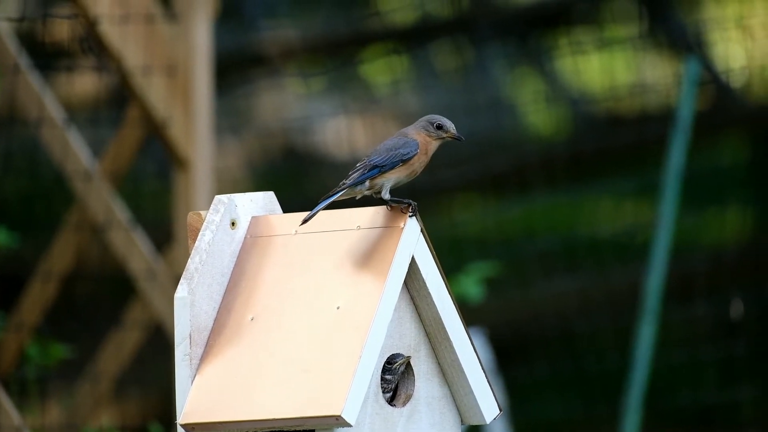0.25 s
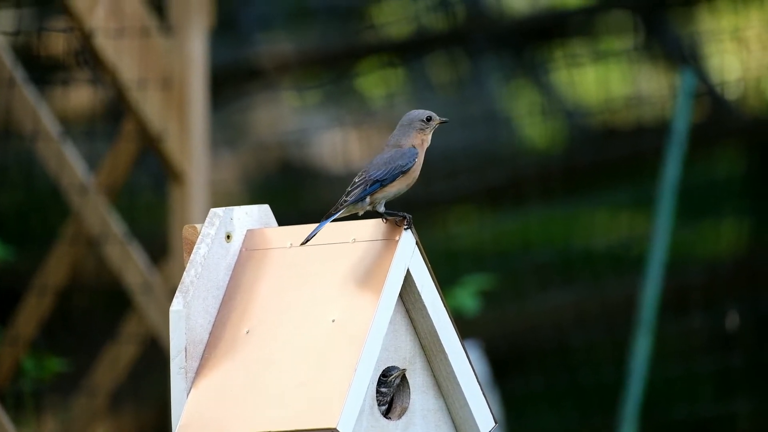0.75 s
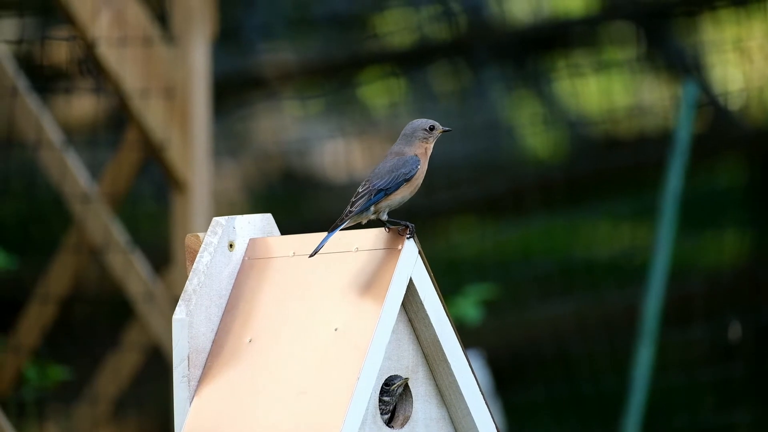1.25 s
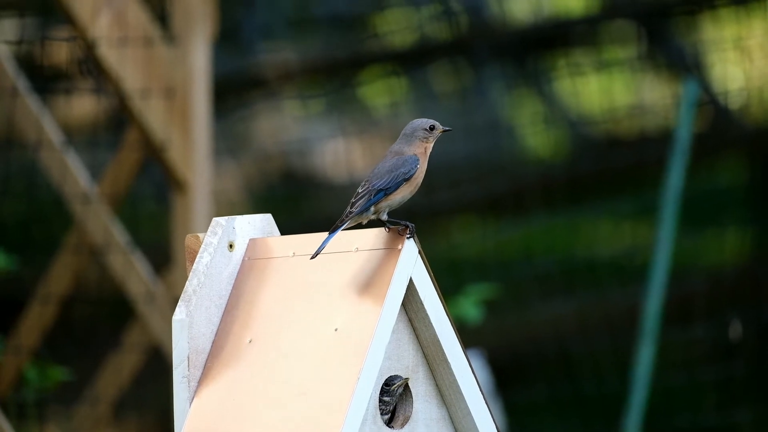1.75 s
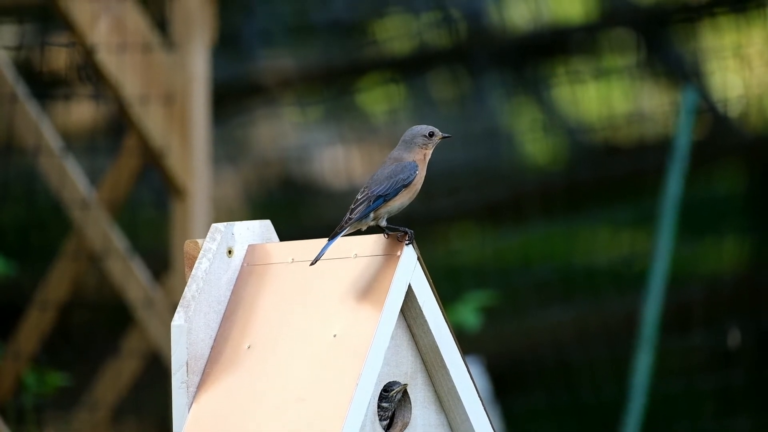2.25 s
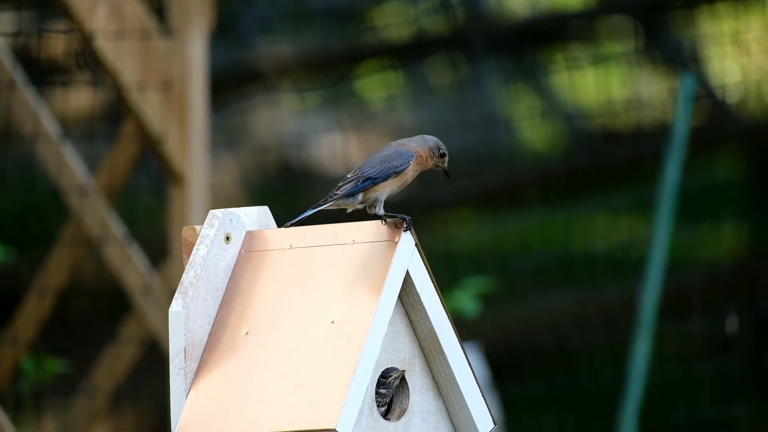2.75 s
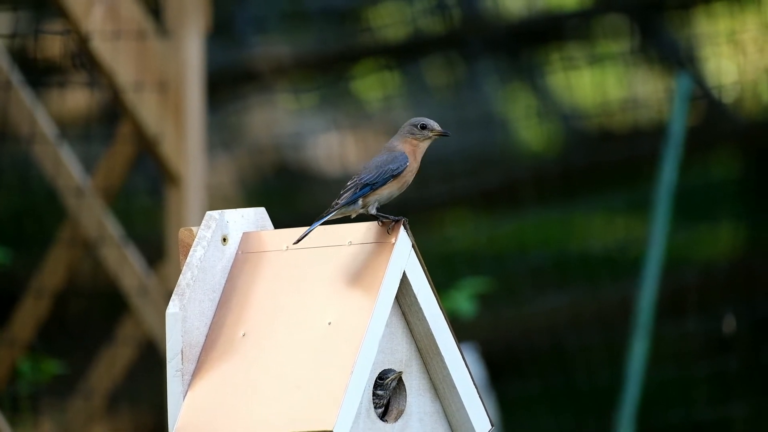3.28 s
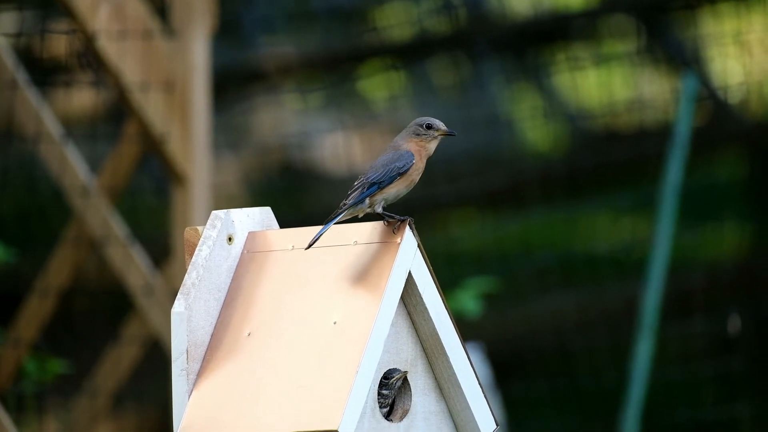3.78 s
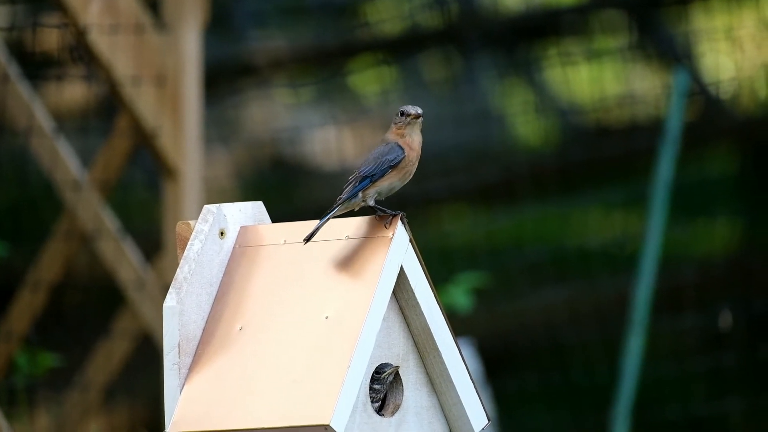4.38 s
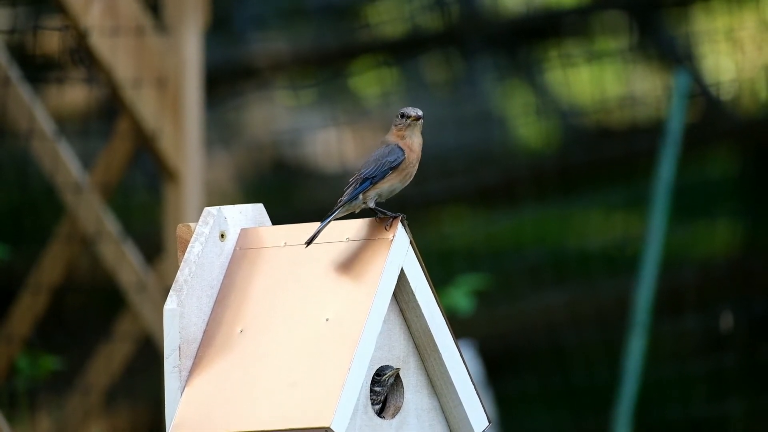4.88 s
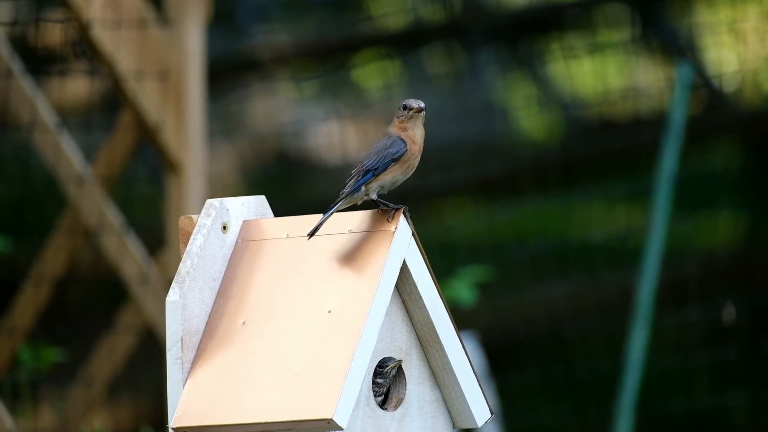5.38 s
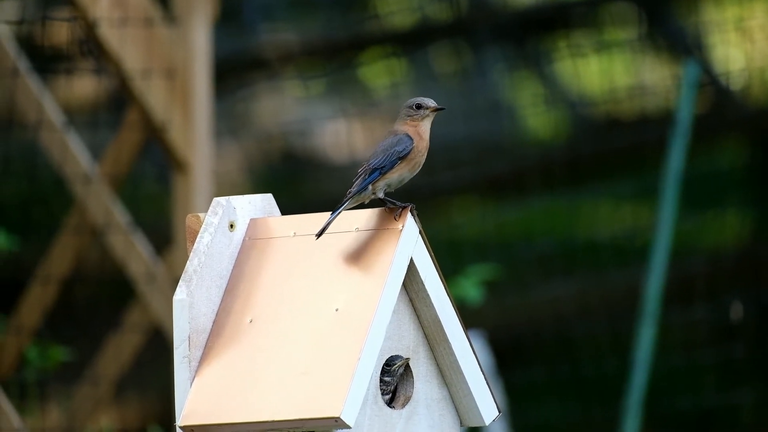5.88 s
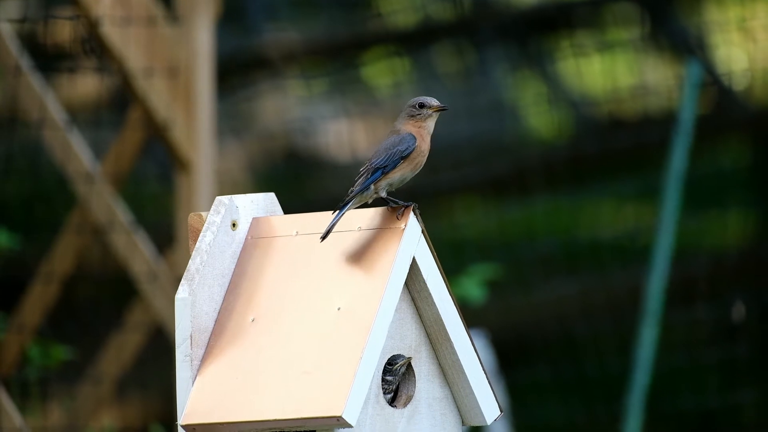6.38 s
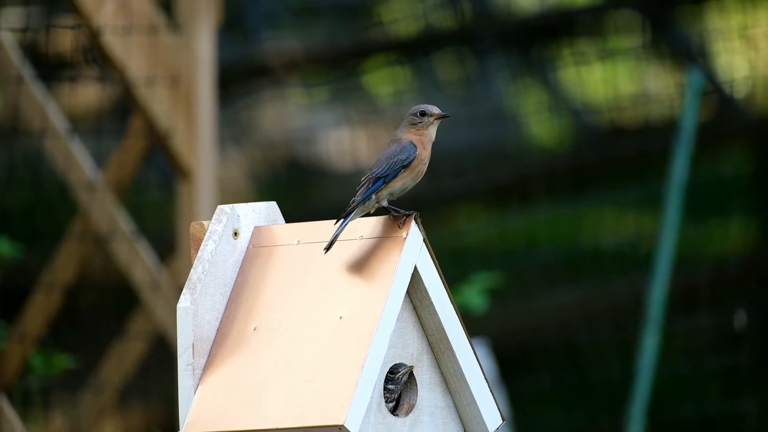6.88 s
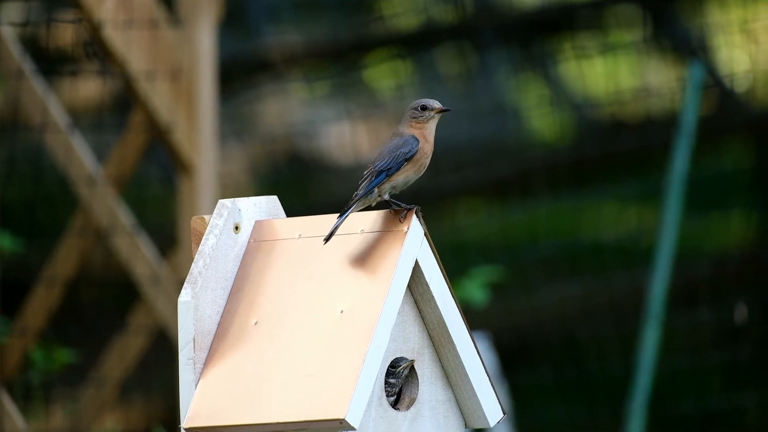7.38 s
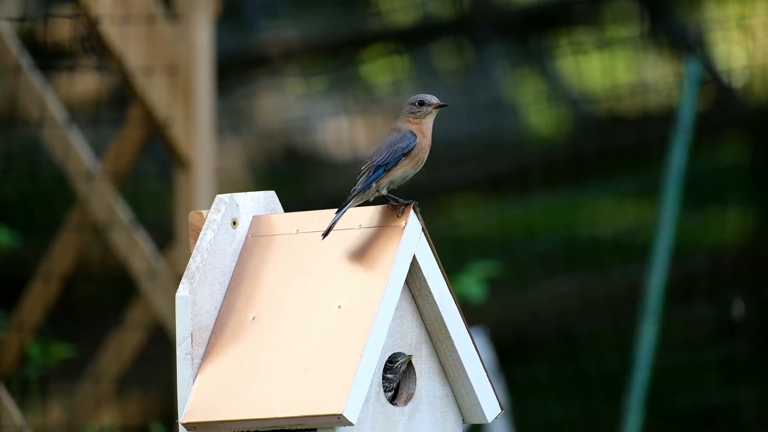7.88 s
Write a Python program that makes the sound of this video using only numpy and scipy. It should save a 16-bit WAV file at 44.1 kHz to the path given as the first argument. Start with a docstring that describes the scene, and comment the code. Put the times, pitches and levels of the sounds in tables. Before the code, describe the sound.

Outdoor stereo pickup at moderate distance: low far traffic and faint airy hiss beneath a small bird's raspy double chirps and mellow downward whistles, heard in three bouts. Faint twittering and thin peeps run behind. After the second bout a vehicle hums by softly and something nearby ticks twice. A distant bird then repeats a steady falling slur under the last chatter and whistles, with two faint dull taps near the end.

```python
"""Far traffic builds under a faint hiss while a bluebird on a nest box in a yard gives dry chatter, then falling whistles.
Thin begging notes and distant song run throughout, with sharp chips now and then; fence and trees echo the birds.
The bluebird chatters and whistles again from the third second; then a vehicle drones past and something ticks twice.
A steady far slur and a last bout of chatter and whistles follow; two faint dull taps come near the end.
Birds are gliding sines or harmonic stacks, knocks are damped tones, and traffic and air are shaped noise."""
import sys
import numpy as np
from scipy import signal
from scipy.fft import rfft, irfft, next_fast_len
from scipy.io import wavfile
from scipy.ndimage import uniform_filter1d, map_coordinates

SR = 44100
rng = np.random.default_rng(int(sys.argv[2]) if len(sys.argv) > 2 else 0)


def unload_audio(sound):
    """Save the sound as a 16-bit wav file, at the path given as the first command line argument."""
    columns = np.transpose(np.atleast_2d(sound))
    # keep every value between -1 and 1, then stretch to whole-number steps
    steps = np.round(np.clip(columns, -1, 1) * 32767)
    wavfile.write(sys.argv[1], SR, steps.astype(np.int16))


N = 358974
T = np.arange(N) / SR
TOP_HZ = 15750  # nothing sounds above this

# Far traffic, its deep rumble, the passing vehicle and the open air.
# Each row: frequency in Hz, relative level in dB per Hz.
ROAD_SPECTRUM = [(60, -30), (100, -8.5), (135, -1), (190, 0.5), (235, -4.5), (300, -10.5), (400, -11.5),
                 (600, -19), (1200, -64)]
RUMBLE_SPECTRUM = [(10, -19.5), (22, -12.5), (40, -7.5), (56, -3), (75, -0.5), (100, -8), (150, -25.5),
                   (400, -50.5)]
DRONE_SPECTRUM = [(70, -22), (120, -1), (180, 0.5), (240, -6), (330, -24), (1500, -90)]
AIR_SPECTRUM = [(300, -11), (500, -2.5), (800, 1), (1200, -3.5), (1800, -8.5), (3000, -11), (4500, -15),
                (6500, -22.5), (10000, -30), (15000, -42.5)]
# Stereo width of the noise. Each row: frequency in Hz, left-right likeness from 0 to 1.
STEREO_LIKENESS = [(60, 0.91), (150, 0.99), (380, 0.93), (950, 0.61), (2380, 0.11), (5980, 0.05),
                   (15000, 0.17)]
TRAFFIC_DB, BUILD_DB, BUILD_S = -48, 4, 2.9  # level once built, how much quieter it starts, time to build
PASS_S, PASS_SPREAD_S, PASS_DB = 4.63, .29, -45.3  # loudest moment, spread of the bell-shaped swell, peak level

# Single echoes off fence and walls.
# Each row: delay in seconds, left level in dB, right level in dB, both before a source's own echo level.
WALL_ECHOES = [(.0045, -25.5, -23.5), (.0125, -6.5, -9.5), (.028, -18.5, -17.5), (.046, -28.5, -26)]
# Decay of the diffuse tail. Each row: frequency in Hz, time to fall 60 dB in seconds.
YARD_DECAY = [(500, 0.15), (2500, 0.61), (7000, 0.46), (14000, 0.36)]

# Bouts of faint, quick twittering. Each row: start in seconds, end in seconds, centre pitch in Hz, level in dB.
TWITTER_BOUTS = [(0, .25, 3400, -71), (.58, .75, 8100, -66), (1.65, 2.25, 2550, -70),
                 (1.95, 2.2, 6200, -73), (2.15, 2.65, 3800, -72), (4.3, 4.7, 2797, -67.5),
                 (4.78, 5.2, 3390, -69), (5.53, 5.72, 2950, -62), (7.55, 8.1, 2650, -65)]
STROKES_PER_S, STROKE_S, STROKE_SPREAD_DB = 24, .035, 1.5
STROKE_OCTAVES, STROKE_GLIDE_OCTAVES = .14, .27  # random spread of pitch, and of how far each stroke slides
# Nearer notes of a distant warbling song.
# Each row: start in seconds, length in seconds, start pitch in Hz, end pitch in Hz, level in dB.
WARBLE_NOTES = [(.1, .11, 3750, 3580, -67), (0.209, .042, 2490, 2360, -56), (1.945, 0.083, 3000, 2420, -68),
                (2.014, 0.14, 2380, 2200, -63), (2.612, .037, 4700, 3470, -62.5),
                (3.69, .07, 2350, 3200, -59), (4.18, .15, 3750, 3426, -63.5), (4.251, .15, 2680, 2250, -55),
                (4.403, .092, 3580, 2650, -56.5), (4.83, 0.056, 3000, 3500, -64),
                (5.436, 0.046, 3080, 2520, -61), (5.464, .059, 3120, 2050, -55),
                (5.566, .045, 2800, 3610, -52), (5.61, 0.048, 2300, 3400, -54.5),
                (5.667, .04, 2500, 3200, -59), (6.039, 0.064, 3400, 2150, -55),
                (6.108, .1, 2500, 2350, -55.5)]
# Thin, nearly level whistles of small birds.
# Each row: start in seconds, length in seconds, middle pitch in Hz, level in dB.
THIN_NOTES = [(.17, .094, 7800, -75), (.53, 0.091, 11200, -69), (.585, 0.14, 7700, -64),
              (.623, .23, 6440, -61.5), (1.625, .16, 7500, -66.5), (2.436, .15, 7760, -70.5),
              (4.88, 0.316, 3240, -72), (5.38, .074, 6380, -72), (5.45, .2, 4320, -74),
              (5.72, .09, 4110, -67), (5.839, .13, 4100, -63.5), (5.93, .14, 8300, -77)]
THIN_SAG = .035  # their ends lie this share above the middle
# Faint low calls from far away. Each row: start in seconds, pitch in Hz, level in dB.
HOOTS = [(.155, 825, -51.5), (.47, 903, -53), (.80, 894, -53.5), (.85, 802, -58), (.98, 806, -52),
         (6.56, 853, -53), (6.80, 873, -51.5)]
# A far songbird's falling notes, louder and deeper each time. Each row: start in seconds, end pitch in Hz, level in dB.
PHRASE_FALLS = [(6.965, 2980, -63), (7.291, 2900, -60.5), (7.612, 2420, -55.5), (7.937, 2330, -53)]
FALL_S, FALL_START_HZ = .095, 3267
# The low scoop before its next fall. Each row: seconds into the phrase, pitch in Hz, relative level in dB.
PHRASE_SCOOP = [(.18, 2403, -9), (.205, 1750, -3), (.24, 1480, -11), (.28, 1560, -5.5), (.325, 1796, -9)]
# Another bird's falling slur. Each row: seconds after the start, pitch in Hz, relative level in dB.
SLUR_SHAPE = [(0, 6700, -21), (.025, 4867, -17), (.055, 4016, -6.5), (.11, 3280, -4), (.15, 2990, -15)]
SLUR_START_S, SLUR_PERIOD_S, SLUR_DB = 6.009, .329, -55.3
# Slow rising whistles. Each row: start in seconds, level in dB.
RISES = [(4.765, -61.5), (5.53, -58.5)]
# Shape of one. Each row: seconds after the start, pitch in Hz, relative level in dB.
RISE_SHAPE = [(0, 1688, -9), (.11, 1890, 0.5), (.19, 2150, -2.5), (.26, 2480, 3.5), (.305, 2560, -3)]

# Faint dull taps. Each row: start in seconds, pitch in Hz, level in dB.
TAPS = [(7.684, 950, -37), (7.741, 1230, -40)]
# Ticks close by. Each row: start in seconds, level in dB.
TICKS = [(5.0556, -24), (5.2192, -18.5)]
# Ringing modes of a tick. Each row: frequency in Hz, relative level in dB, time to fall 60 dB in seconds.
TICK_MODES = [(400, -16, 0.016), (1110, -4.5, 0.0074), (1590, -4.5, 0.0039), (2470, -7, 0.0035),
              (4560, -12, 0.004)]

# Sharp rising chips. Each row: start in seconds, level in dB.
CHIPS = [(1.706, -39.5), (4.05, -39.5), (7.329, -38.5)]
# Shape of one chip. Each row: seconds after the start, pitch in Hz, relative level in dB.
CHIP_SHAPE = [(0, 5120, -11), (.003, 6010, -2.5), (.005, 6800, 1.5), (.008, 7870, -4), (.010, 8200, -4.5),
              (.012, 8530, -28)]
# Thin begging notes. Each row: seconds at the dip, level in dB, length as a share of the full shape.
BEGS = [(.41, -60.5, 1), (.87, -59, 0.72), (1.369, -61, 0.77), (1.946, -56.5, 0.68), (3.434, -55.5, 1),
        (5.125, -59.5, 1), (6.90, -53.5, 1)]
# Shape of one at full length. Each row: seconds from the dip, pitch in Hz, relative level in dB.
BEG_SHAPE = [(-.028, 10500, -20), (-.018, 8320, -11), (-.007, 7390, -2.5), (.004, 7200, -2),
             (.03, 7900, -7.5), (.055, 8760, -11.5), (.075, 10050, -20)]

# Bluebird chatter. Each row: seconds at the top of the arch, reference pitch in Hz, level in dB.
CHATTER_NOTES = [(.331, 928, -33.5), (.399, 1065, -32.5), (2.710, 925, -36), (2.768, 1082, -35),
                 (3.320, 914, -35.7), (6.255, 944, -32.5), (6.355, 1156, -32)]
# Shape of one note. Each row: seconds from the top, ratio to the reference pitch, relative level in dB.
CHATTER_ARCH = [(-.026, .42, -27.5), (-.016, .52, -12), (-.009, .70, -8), (-.003, 0.91, -3.5),
                (0, 0.96, -3.5), (.003, .96, -4.5), (.008, .72, -11), (0.013, .55, -34)]
# Resonance of the throat. Each row: frequency in Hz, gain in dB.
THROAT_RESONANCE = [(900, -41), (1500, -18), (2000, -9), (2900, 6), (3400, 0), (4200, -6), (5300, -15.5),
                    (6300, -32.5), (10000, -34), (15000, -42)]

# Bluebird whistles. Each row: start in seconds, length in seconds, pitch in Hz at the start, a third,
# two thirds and the end (before scoop and hook), scoop as a share of pitch, hook as a share of pitch,
# peak level in dB, attack in seconds, fade after the peak in dB.
WHISTLES = [(.505, 0.24, 3030, 2660, 2435, 2150, .05, 0.018, -28.5, 0.058, 18),
            (.826, 0.13, 2500, 2435, 2330, 2190, .03, .05, -42.5, 0.017, 1),
            (3.79, .26, 2850, 2638, 2380, 2090, .03, 0, -29.2, 0.051, 13.3),
            (6.414, 0.23, 3126, 2659, 2485, 2250, .13, .1, -28.5, .066, 12.6),
            (6.713, .142, 2515, 2446, 2360, 2175, .03, 0.084, -35, 0.041, 4.5),
            (6.902, .11, 2600, 2285, 2120, 2154, .24, 0.036, -40, 0.017, 4.2)]
# Each row: multiple of the fundamental, relative level in dB before the beak's colour.
WHISTLE_OVERTONES = [(2, -34), (3, -40.5), (4, -37.5), (5, -38.5), (6, -39)]
# The beak's colour on the overtones. Each row: frequency in Hz, gain in dB.
BEAK_COLOUR = [(4000, 13), (4500, 5), (5000, -3.5), (5700, -16), (7500, -6), (9000, -5.5), (10500, -0.5),
               (15000, -11)]
SCOOP_S, HOOK_S = .011, .005  # time constants of the slide up into pitch and the hook down at the end
ONSET_DB, RELEASE_DB = 23.5, 10  # how far below its peak a whistle starts, and the extra drop as it stops
ATTACK_CURVE = 1.48  # above 1, the swell slows as it nears the peak


def amp(db):
    """Decibels to gain."""
    return 10 ** (np.asarray(db) / 20)


def unit(x):
    """Scale to rms 1."""
    return x / np.sqrt(np.mean(x ** 2) + 1e-20)


def along(points, hz):
    """Read (Hz, value) points on a log frequency axis."""
    f, v = np.transpose(points)
    return np.interp(np.log(hz + 1), np.log(f + 1), v)


def wobble(rate, size=N):
    """A smooth random curve through `rate` random knots a second."""
    knots = rng.standard_normal(int(size * rate / SR) + 4)
    return map_coordinates(knots, [np.arange(size) * rate / SR])


def filtered(x, response):
    """Shape x by a response given as a function of frequency."""
    m = next_fast_len(N + SR // 2)
    return irfft(rfft(x, m) * response(np.fft.rfftfreq(m, 1 / SR)), m)[..., :N]


def add(track, s, sound):
    """Mix a sound into a track at time s."""
    part = track[max(round(s * SR), 0):][:len(sound)]
    part += sound[:len(part)]


def gesture(rows, jitter):
    """Pitch, phase and gain of one note from (s, Hz, dB) rows; jitter is a random share of the pitch."""
    s, hz, db = np.transpose(rows)
    t = np.arange(s[0], max(s[-1], s[0] + .005), 1 / SR)
    smooth = uniform_filter1d(np.interp(t, s, hz), len(t) // 10 + 1, mode="nearest")
    pitch = smooth * (1 + jitter * wobble(341.7, len(t)))
    phase = 2 * np.pi * np.cumsum(pitch) / SR
    edges = signal.windows.tukey(len(t), .1)
    return pitch, phase, np.sqrt(2) * edges * amp(np.interp(t, s, db))  # root 2: levels are rms of a sine


def tones(notes, jitter, overtones=()):
    """Whistled notes: a sine on each gesture, with optional weak overtones."""
    out = np.zeros(N)
    for rows in notes:
        _, phase, gain = gesture(rows, jitter)
        upper = sum(amp(db) * np.sin(k * phase) for k, db in overtones)
        add(out, rows[0][0], gain * (np.sin(phase) + upper))
    return out


def repeated(shape, events):
    """The same note shape sung at each (s, dB)."""
    return [[(s + dt, hz, db + rel) for dt, hz, rel in shape] for s, db in events]


def series(start_s, period_s, db, count):
    """(s, dB) of evenly paced repeats."""
    return [(start_s + k * period_s, db) for k in range(count)]


def arc(s, length, pitches, db, fade_db):
    """Rows of a note that bends smoothly through three pitches and is loudest in the middle."""
    u = np.linspace(-1, 1, 9)
    bend = np.polyval(np.polyfit([-1, 0, 1], pitches, 2), u)
    return np.transpose([s + length * (u + 1) / 2, bend, db - fade_db * u ** 2])


def glide(s, length, start_hz, end_hz, db, fade_db):
    """Rows of a note that slides smoothly from one pitch to another through their geometric mean."""
    return arc(s, length, [start_hz, np.sqrt(start_hz * end_hz), end_hz], db, fade_db)


def yard(x, pan_db, wall_db, tail_db):
    """Direct sound (pan is left over right), single echoes off fence and walls, and a diffuse tail from the trees."""
    hz, t, z = signal.stft(rng.standard_normal((2, SR * 2 // 3)), SR, nperseg=256)
    decay = amp(-60 * t / along(YARD_DECAY, hz)[:, None])
    tail = signal.istft(z * decay, SR, nperseg=256)[1]
    response = amp(tail_db) * tail / np.linalg.norm(tail[0])
    response[:, 0] += amp([pan_db / 2, -pan_db / 2])
    for delay, left_db, right_db in WALL_ECHOES:
        response[:, round(delay * SR)] += amp(wall_db) * amp([left_db, right_db])
    return signal.fftconvolve(x[None], response, axes=1)[:, :N]


def scattered(x, scatter_db, t60):
    """Nearby twigs and lattice smear a sharp sound over a few hundredths of a second."""
    t = np.arange(SR // 8) / SR
    spray = amp(-60 * t / t60) * rng.standard_normal((2, len(t)))
    smear = signal.fftconvolve(x, spray / np.linalg.norm(spray[0]), axes=1)[:, :N]
    return x + amp(scatter_db) * smear


def rush(spectrum):
    """Stereo noise of rms 1: mid and side shares set how alike left and right are at each frequency."""
    def mid_side_response(hz):
        turn = np.arccos(np.clip(along(STEREO_LIKENESS, hz), -1, 1)) / 2
        return amp(along(spectrum, hz)) * [np.cos(turn), np.sin(turn)]

    mid, side = filtered(rng.standard_normal((2, N)), mid_side_response)
    return unit(np.array([mid + side, mid - side]))


def background(rumble_db=-52.8, air_db=-57.5, drift_db=0.93, surge_db=0.76):
    """Far traffic and its rumble build and surge as shaped noise, a vehicle drones past, and the open air hisses."""
    swell = surge_db * wobble(8) - BUILD_DB * np.clip(1 - T / BUILD_S, 0, 1)
    traffic = amp(TRAFFIC_DB + swell) * rush(ROAD_SPECTRUM)
    rumble = amp(rumble_db + swell) * rush(RUMBLE_SPECTRUM)
    passing = np.exp(-((T - PASS_S) / PASS_SPREAD_S) ** 2 / 2)
    vehicle = amp(PASS_DB) * passing * rush(DRONE_SPECTRUM)
    air = amp(air_db + drift_db * wobble(2.98)) * rush(AIR_SPECTRUM)
    return traffic + rumble + vehicle + air


def twitter(fade_db=9):
    """Rows of the faintest birds: each bout is a run of short strokes that slide up or down at random."""
    notes = []
    for start, stop, centre_hz, db in TWITTER_BOUTS:
        times = np.arange(start, stop, 1 / STROKES_PER_S)
        for s, (when, pitch, slope, size) in zip(times, rng.standard_normal((len(times), 4))):
            hz = centre_hz * 2 ** (STROKE_OCTAVES * pitch)
            bend = 2 ** (STROKE_GLIDE_OCTAVES * slope / 2)
            onset = s + when / STROKES_PER_S / 2
            notes.append(glide(onset, STROKE_S, hz / bend, hz * bend, db + STROKE_SPREAD_DB * size, fade_db))
    return notes


def far_birds(fade_db=10, hoot_length=0.042, flutter_db=2.8):
    """Distant notes swell, flutter and fade with much echo; slurs and rising whistles carry more clearly."""
    notes = [glide(*row, fade_db) for row in WARBLE_NOTES] + twitter()
    notes += [glide(s, FALL_S, FALL_START_HZ, end_hz, db, fade_db) for s, end_hz, db in PHRASE_FALLS]
    notes += repeated(PHRASE_SCOOP, [(s, db) for s, _, db in PHRASE_FALLS[:-1]])
    thin = []
    for s, length, hz, db in THIN_NOTES:
        end_hz = hz * (1 + THIN_SAG)
        thin.append(arc(s, length, [end_hz, hz, end_hz], db, fade_db))
    hoots = [arc(s, hoot_length, [hz, hz, hz], db, fade_db) for s, hz, db in HOOTS]
    song = tones(notes, jitter=.016) + tones(thin, jitter=.011) + tones(hoots, jitter=0.029)
    song *= amp(flutter_db * wobble(90))
    slurs = tones(repeated(SLUR_SHAPE, series(SLUR_START_S, SLUR_PERIOD_S, SLUR_DB, count=7)), jitter=.004)
    rises = tones(repeated(RISE_SHAPE, RISES), jitter=.003)
    return (yard(song, pan_db=-3, wall_db=-6.5, tail_db=-1.5)
            + yard(slurs, pan_db=2.0, wall_db=0.5, tail_db=-6.5)
            + yard(rises, pan_db=-2, wall_db=-9, tail_db=-4.5))


def taps(t60=0.015, rough=0.98):
    """Soft, quickly damped taps further off: a sine with a rough, randomly wavering level."""
    out, t = np.zeros(N), np.arange(SR // 10) / SR
    for s, hz, db in TAPS:
        ring = np.sin(2 * np.pi * hz * t) * (1 + rough * wobble(760, len(t)))
        attack = 1 - np.exp(-t / 0.00092)
        add(out, s, amp(db - 60 * t / t60) * ring * attack)
    return yard(out, pan_db=0, wall_db=-6, tail_db=-1)


def ticks(crack_db=-14, crack_t60=0.0089, dull_hz=6000):
    """Two small dry knocks close by: damped modes and a crack of noise, a little different left and right."""
    out, t = np.zeros((2, N)), np.arange(SR // 20) / SR
    attack = 1 - np.exp(-t / 0.000067)
    for s, db in TICKS:
        for channel in out:
            ring = np.zeros(len(t))
            for hz, level, t60 in TICK_MODES:
                ring += amp(level - 60 * t / t60) * np.sin(2 * np.pi * hz * t + rng.normal(0, 1))
            crack = amp(crack_db - 60 * t / crack_t60) * rng.standard_normal(len(t))
            add(channel, s, amp(db) * (ring + crack) * attack)
    # a second-order low-pass dulls the knock
    return filtered(out, lambda hz: 1 / (1 + 1j * hz / dull_hz - (hz / dull_hz) ** 2))


def high_calls():
    """Sharp chips that ring through the trees, and thin scooped begging notes, all gliding sines."""
    chips = tones(repeated(CHIP_SHAPE, CHIPS), jitter=0.027, overtones=[(1.9, -26.0)])
    chips = scattered(yard(chips, pan_db=2.0, wall_db=-2, tail_db=-4), scatter_db=-2.0, t60=0.077)
    beg_notes = [[(s + stretch * dt, hz, db + rel) for dt, hz, rel in BEG_SHAPE] for s, db, stretch in BEGS]
    begs = tones(beg_notes, jitter=0.0054)
    return chips + yard(begs, pan_db=9.0, wall_db=-12, tail_db=-6.0)


def chatter(jitter=0.0091, rasp=0.33):
    """Each dry note is a raspy harmonic stack that arches up and down through the throat's resonance."""
    out = np.zeros(N)
    for s, top_hz, db in CHATTER_NOTES:
        rows = [(s + dt, top_hz * ratio, db + rel) for dt, ratio, rel in CHATTER_ARCH]
        pitch, phase, gain = gesture(rows, jitter)
        stack = np.zeros(len(phase))
        for k in range(2, 14):  # the fundamental is left out
            harmonic = np.sin(k * phase + rng.uniform(0, 2 * np.pi))
            roughness = 1 + rasp * wobble(732, len(phase))
            stack += amp(along(THROAT_RESONANCE, k * pitch)) * harmonic * roughness
        add(out, rows[0][0], gain * unit(stack))
    return yard(out, pan_db=-2.5, wall_db=-2.5, tail_db=-9.5)


def whistle(s, length, start_hz, early_hz, late_hz, end_hz, scoop, hook, db, attack_s, fade_db):
    """Rows of one whistle: it scoops up and swells, sinks as it fades, and hooks down as it stops."""
    t = np.linspace(0, length, 100)
    thirds = np.linspace(0, length, 4)
    sink = np.polyval(np.polyfit(thirds, [start_hz, early_hz, late_hz, end_hz], 3), t)
    ending = np.exp((t - length) / HOOK_S)
    pitch = sink * (1 - scoop * np.exp(-t / SCOOP_S) - hook * ending)
    onset = np.interp(t, [0, attack_s], [1, 0]) ** ATTACK_CURVE
    fade = np.interp(t, [attack_s, length], [0, 1])
    return np.transpose([s + t, pitch, db - ONSET_DB * onset - fade_db * fade - RELEASE_DB * ending])


def whistles(jitter=0.0042, late_db=12):
    """Nearly pure falling notes; the overtones gain on the fundamental as each note sinks."""
    out = np.zeros(N)
    for s, *note in WHISTLES:
        pitch, phase, gain = gesture(whistle(s, *note), jitter)
        overtones = np.zeros(len(phase))
        for k, db in WHISTLE_OVERTONES:
            overtones += amp(db + along(BEAK_COLOUR, k * pitch)) * np.sin(round(k) * phase)
        brighten = amp(late_db * np.linspace(-.5, .5, len(phase)))
        add(out, s, gain * (np.sin(phase) + brighten * overtones))
    return yard(out, pan_db=-5.0, wall_db=-1, tail_db=-11.0)


def scene():
    """Everything heard in the yard, from the background to the bluebird."""
    return background() + far_birds() + taps() + ticks() + high_calls() + chatter() + whistles()


def record(dry):
    """A sharp band limit cuts everything from TOP_HZ up."""
    return filtered(dry, lambda hz: hz < TOP_HZ)


dry = scene()
out = record(dry)
unload_audio(out)
```